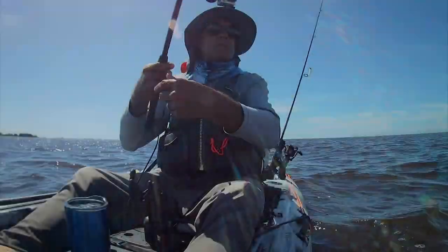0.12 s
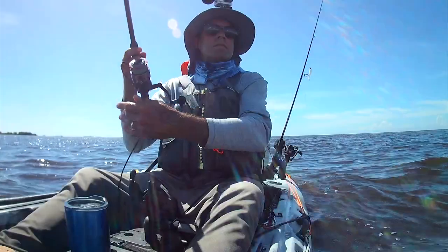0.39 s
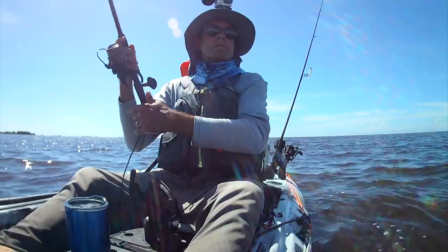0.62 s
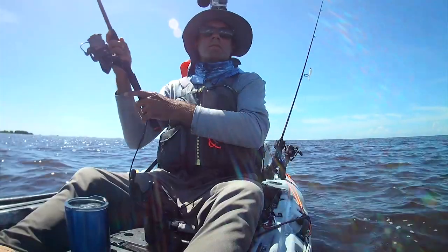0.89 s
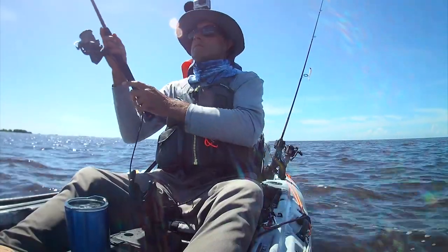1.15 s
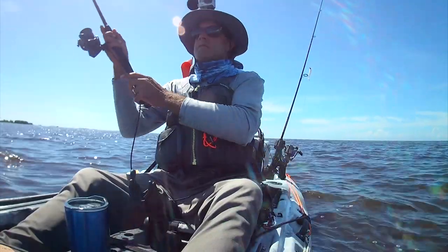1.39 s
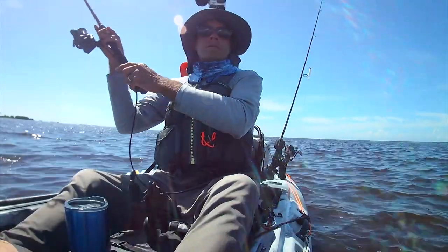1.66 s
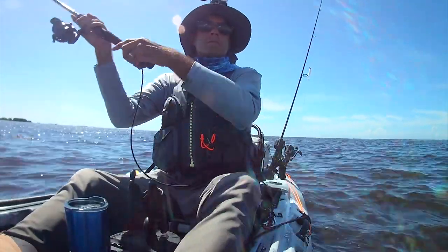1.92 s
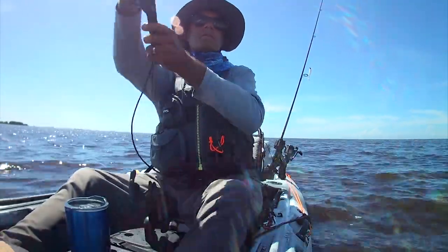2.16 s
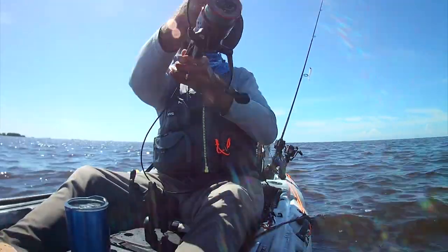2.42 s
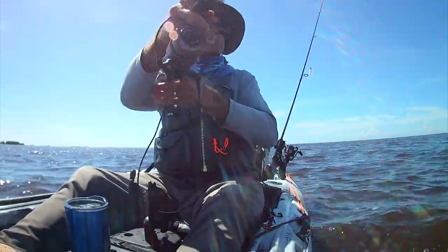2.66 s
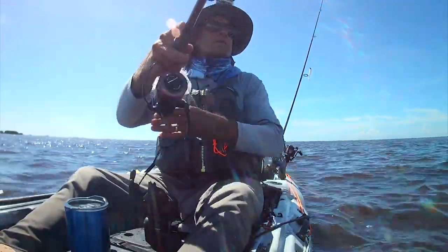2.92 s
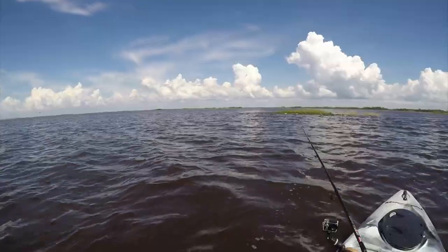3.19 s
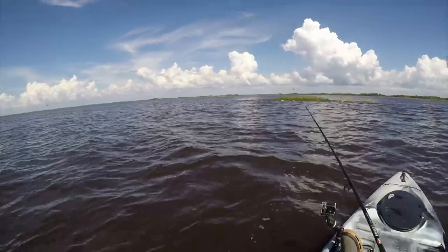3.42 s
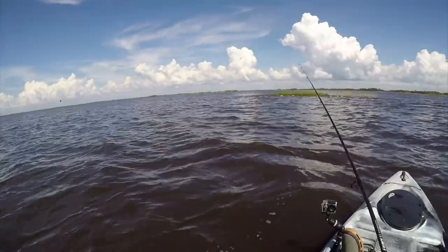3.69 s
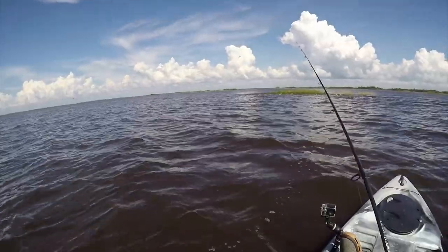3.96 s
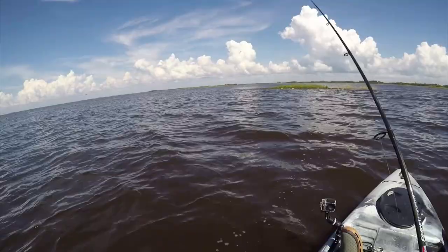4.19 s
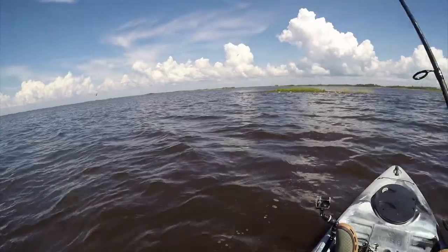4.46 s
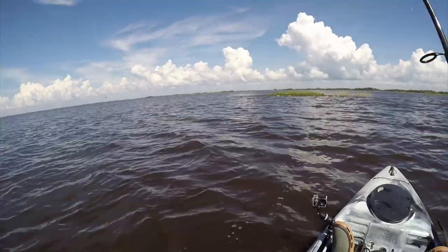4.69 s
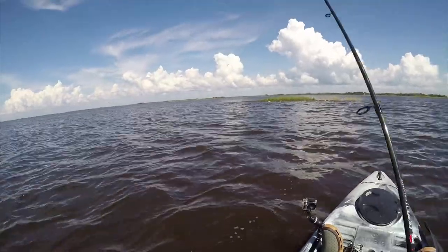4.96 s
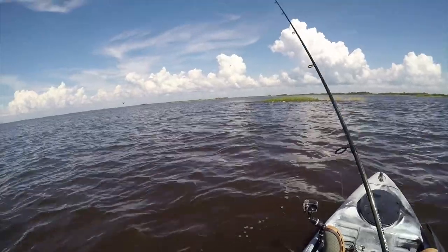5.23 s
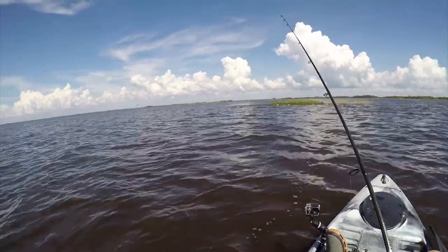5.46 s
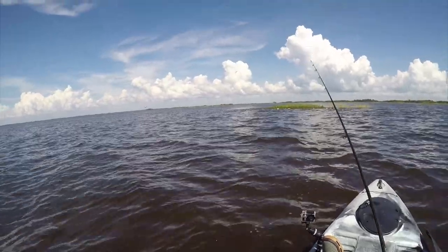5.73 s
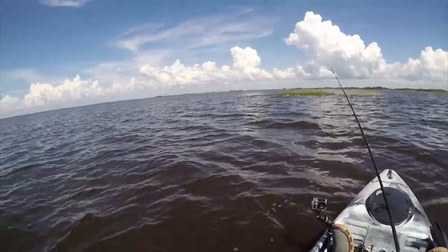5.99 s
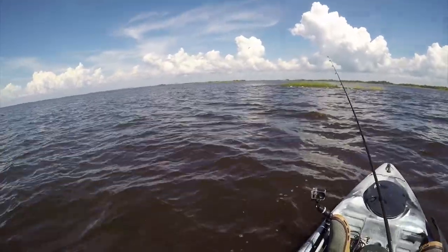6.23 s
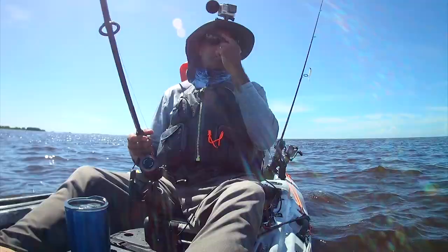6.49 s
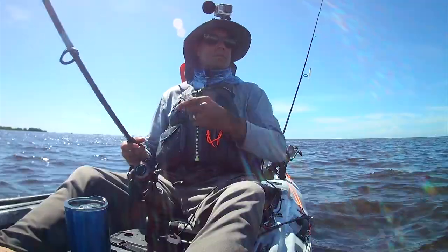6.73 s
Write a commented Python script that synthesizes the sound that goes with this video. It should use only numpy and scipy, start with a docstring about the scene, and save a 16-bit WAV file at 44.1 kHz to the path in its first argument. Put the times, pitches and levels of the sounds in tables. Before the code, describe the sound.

Wind rumbles on the microphone over hissing open water as a reel clicks, a rod whips, line hisses out and wavelets gulp against a hull.

```python
"""Casting from a kayak

An angler in a plastic kayak on breezy open water casts a lure. Wind rumbles on the microphone as swelling low noise
and water hisses in noise bands; a small bait pump chugs in its bucket, its strokes exciting housing resonances.
Wavelets gulp on the hull as gliding sine bubbles. Reel clicks and scrapes are short noise bursts; the cast is
shaped noise: a rod swish, line hiss in the guides and a drifting rub on the spool lip."""
import sys
import numpy as np
from scipy import signal
from scipy.io import wavfile
from scipy.ndimage import uniform_filter1d

SR = 44100
rng = np.random.default_rng(int(sys.argv[2]) if len(sys.argv) > 2 else 0)


def volts(x):
    """Linear amplitude factor 10**(x/20) for a level x in dB, scalar or array-like."""
    e = np.asarray(x, float) / 20
    return 10 ** e


def store_wav(level_fs):
    """Save 16-bit WAV to argv[1]."""
    pcm = np.round(np.clip(np.atleast_2d(level_fs), -1, 1) * 32767)
    wavfile.write(sys.argv[1], SR, pcm.T.astype(np.int16))


N = 302967  # length in samples

# The strongest wind buffets. Each row: centre in seconds, level of the slow eddies in dB, of the quick eddies in dB.
WIND_BUFFETS = [(.02, -22.5, -33), (.09, -27.5, -41), (.3, -32, -42), (.57, -20.5, -37), (.19, -39, -30),
                (.4, -25, -31.5), (1.63, -40, -31.5), (.83, -27.5, -44), (1.07, -39, -31),
                (1.18, -19.5, -35.5), (1.42, -18, -57), (1.58, -13, -42), (1.76, -20.5, -34.5),
                (2.24, -29, -33), (2.47, -24.5, -42), (2.82, -19.5, -32), (3.16, -22.5, -53),
                (3.32, -25, -31.5), (3.42, -19.5, -52), (3.56, -19.5, -51), (3.848, -19, -37.5),
                (4.0, -27, -52), (4.26, -21.5, -52), (4.38, -22, -35.5), (4.52, -18.5, -40),
                (4.74, -18, -41), (5.02, -28.5, -37.5), (5.16, -19, -43), (5.4, -27.5, -38),
                (5.65, -22, -40), (5.92, -22.5, -40), (6.02, -18.5, -43), (6.13, -28, -41),
                (6.19, -18.5, -39), (6.39, -21, -36), (6.65, -21, -52)]
# Tone of open water and breeze. Each row: frequency in Hz, relative density in dB per Hz.
WATER_TONE = [(65, -31), (110, 3.5), (314, -11.5), (619, -11.5), (1010, -16), (1270, -23), (1590, -22.5),
              (1770, -23.5), (3410, -27), (6070, -38.5), (15000, -39)]
# Resonances of the pump housing. Each row: centre in Hz, width in Hz, relative level in dB,
# drop on every other turn in dB.
PUMP_HOUSING = [(1024, 76, 0, 3), (1560, 125, -7, 1), (2130, 110, -16, 0), (3040, 130, -18, 3),
                (3405, 210, -8, 4), (4500, 600, -8.5, 0)]
# Pump strokes within one turn. Each row: start in turns, then the drive into each housing resonance in dB.
PUMP_STROKES = [(.07, -22, -5, -6, -6, -9, -3), (.17, 0, -5, 0, 0, 0, -4), (.29, -24, -8, -10, -4, -1, -3),
                (.42, -30, -14, -12, -10, -10, -4), (.4932, -11, -10, -8, -8, -16, -2),
                (.6, -24, 0, -3, -8, -20, -12), (.75, -26, -6, -12, -10, -12, -1)]
# The lowest housing resonance swells and fades. Each row: time in seconds, level in dB.
PUMP_HUM = [(0, -58), (2.1, -58), (2.6, -55), (3.4, -55.5), (3.56, -64), (3.75, -56), (6.2, -58.5),
            (6.4, -68), (6.87, -59.5)]
# Small bright droplets and taps. Each row: time in seconds, ring level in dB, starting pitch in Hz.
DROPLETS = [(.333, -47, 1900), (.36, -37, 1240), (.502, -47.5, 1350), (1.6023, -35.5, 1410),
            (1.8265, -37, 1324), (2.411, -47, 1870), (2.956, -36.5, 5840), (3.347, -45, 1180),
            (3.445, -48, 2320), (3.6444, -51, 2050), (3.765, -47, 1350), (3.8883, -42.5, 1290),
            (3.948, -37.5, 1460), (4.1384, -46.5, 1760), (4.6423, -44, 1255), (4.6643, -41, 3300),
            (4.836, -43, 2140), (4.8667, -38.5, 3610), (4.94, -48, 1380), (5.057, -40, 1950),
            (5.193, -28.5, 1850), (5.2076, -32.5, 1790), (5.21, -38.5, 1360), (5.702, -47, 2170),
            (5.781, -44, 1590), (5.875, -46, 1010), (5.933, -48, 1600), (5.44, -48, 1400),
            (5.59, -47, 1280), (4.517, -49, 1350), (5.312, -48, 1810), (5.748, -53, 6200),
            (5.756, -54, 5000), (5.74, -47, 3200), (5.804, -55, 7350), (5.813, -52, 6300),
            (5.832, -56, 5660), (5.845, -60, 7000), (4.843, -52, 3300), (1.824, -47, 3500),
            (1.83, -44, 1060), (2.329, -30, 5900), (4.76, -53, 4600)]
# Air pockets trapped between wavelet and hull. Each row: time in seconds, ring level in dB, starting pitch in Hz,
# slap level at its onset in dB.
HULL_GULPS = [(.321, -36.5, 650, -60), (0.344, -27, 462, -59), (.359, -49, 640, -57), (.379, -25, 566, -32),
              (.391, -36, 560, -57), (1.263, -41, 610, -47), (1.581, -39, 675, -50), (1.603, -35, 650, -41),
              (1.61, -29.5, 574, -57), (1.626, -24.5, 578, -43), (1.824, -36, 774, -49),
              (1.832, -36, 720, -55), (2.14, -42, 330, -62), (3.905, -39.5, 344, -65),
              (4.125, -43, 690, -60), (2.085, -48, 527, -59), (3.894, -46, 620, -65),
              (3.954, -39, 895, -36), (3.979, -46, 620, -45), (4.649, -29, 633, -53),
              (4.673, -29.5, 590, -63), (5.058, -49, 523, -63), (5.076, -46, 515, -61),
              (5.798, -35.5, 578, -47), (5.803, -42, 553, -39.5), (5.824, -41, 550, -50),
              (5.86, -51, 700, -57), (6.336, -39.5, 540, -49)]
# Wavelets breaking up along the hull. Each row: start in seconds, length in seconds, level in dB,
# highest starting pitch of the bubbles in Hz.
HULL_WASH = [(0.311, 0.12, -43, 1490), (1.196, 0.16, -50.5, 1210), (1.569, .12, -46.5, 1930),
             (1.813, 0.054, -57, 2000), (2.057, 0.17, -47, 1104), (3.326, 0.089, -55, 1790),
             (3.873, .05, -54, 1200), (3.938, 0.032, -44.5, 3500), (3.95, 0.048, -51.5, 2200),
             (5.856, 0.034, -56, 3580), (4.634, 0.093, -48.5, 1600), (5.055, 0.06, -48.5, 1500),
             (5.681, 0.27, -56.5, 5570), (5.403, 0.1, -56, 1710), (4.102, .09, -59, 1900),
             (5.201, 0.019, -47, 1300), (5.776, 0.094, -41.5, 894), (6.302, 0.085, -63, 1210)]
# Clicks of reel, rod and line. Each row: time in seconds, onset level in dB, centre in Hz,
# body relative to the bright part in dB.
TACKLE_CLICKS = [(.027, -48, 11500, 10.5), (.2157, -17, 11800, -11), (.2204, -31, 11800, -10),
                 (.2303, -41, 12300, 9.5), (.332, -49, 12000, -12), (.343, -50, 12000, -12),
                 (.392, -43, 9800, -17), (.5457, -46, 6000, -4), (.561, -45, 3600, -6),
                 (.5995, -50, 11300, -11), (.6717, -47, 12900, -16), (.7437, -47, 11500, -21),
                 (1.1982, -46.5, 9000, 2), (1.6232, -34, 13200, -22), (1.6347, -29, 9550, -11),
                 (1.8507, -45, 4150, -3), (1.973, -45.5, 9060, -17), (2.145, -50, 7200, 3),
                 (2.2067, -35.5, 8900, -12), (2.2694, -28.5, 9670, -17), (2.3125, -24, 12300, -22),
                 (2.329, -21, 11500, -7.5), (2.386, -39, 12800, 4.5), (2.4117, -21.5, 13600, -10.5),
                 (2.5667, -44, 12800, 1), (2.7278, -37, 12800, -0.5), (2.8577, -46.5, 8800, 5),
                 (2.9564, -36, 11700, -14), (3.148, -41, 5930, -2), (2.945, -42, 4500, -8),
                 (3.337, -38, 5500, -7), (3.025, -50, 2600, -8), (3.458, -52, 1500, -20),
                 (2.128, -49, 7600, -20), (.514, -58, 6800, -20), (2.295, -34, 7000, -15),
                 (3.467, -37, 11700, -19), (3.488, -23.5, 12100, -22), (4.015, -53, 10800, -1),
                 (4.2464, -52, 7150, 7), (4.665, -44.5, 6550, 2), (4.8852, -42, 7160, -15),
                 (4.9496, -47, 10700, -8), (5.123, -52, 9000, -10), (5.4227, -50, 12000, 0),
                 (5.77, -44, 3500, -12), (5.906, -41, 3270, -18), (5.862, -55, 3900, -10),
                 (5.874, -45, 2600, -14), (5.1924, -25, 9100, 1), (5.2092, -32, 12600, -13),
                 (5.7994, -33, 10700, -16), (6.351, -40, 11400, -23)]
# Line and cloth dragged over the gear. Each row: time in seconds, level at the height of the stroke in dB,
# centre in Hz, body relative to the bright part in dB, length in seconds.
TACKLE_SCRAPES = [(0.047, -59, 12000, -6, 0.025), (.411, -56, 13000, -14, 0.012),
                  (0.553, -64, 10400, 7, 0.026), (2.277, -39, 11500, -13, 0.045),
                  (2.412, -42.5, 12300, 0, 0.015), (3.344, -47, 11000, -10, 0.013),
                  (3.907, -46, 12600, -20, 0.027), (3.936, -53.5, 11260, 11, 0.024),
                  (0.679, -64, 10500, -10, 0.019), (0.098, -65, 11500, -3, .035),
                  (4.054, -63, 7850, -1, 0.01), (4.163, -52.5, 6550, -9, 0.053),
                  (4.164, -53, 11500, -24, 0.056), (5.193, -31.5, 12700, -14, 0.012),
                  (5.199, -52.5, 12100, 6, 0.026), (5.31, -42, 12900, -8, 0.013),
                  (6.364, -50, 11500, -21, 0.012)]
# Line running through the guides. Each row: time in seconds, level in dB.
LINE_HISS = [(2.17, -70), (2.27, -47), (2.45, -49), (2.6, -47.5), (2.76, -47.5), (2.88, -53.5),
             (3.1, -58.5), (3.3, -60.5), (3.55, -60.5), (3.75, -56.5), (3.92, -61), (3.955, -64)]
# Line rubbing the spool lip. Each row: time in seconds, level in dB, centre in Hz, focus from 0 (wide) to 1 (narrow).
SPOOL_LIP = [(2.72, -73, 9300, .5), (2.86, -58, 8820, .3), (3.05, -56, 8100, .45), (3.2, -55.5, 7600, .6),
             (3.32, -57, 7190, .5), (3.42, -58.5, 7800, .1), (3.6, -58, 8440, .15), (3.95, -60, 8400, 0)]

# wind: steady level of each eddy size, how much both wander, and the time constant of a buffet
SLOW_DB, QUICK_DB, WANDER_DB, BUFFET_S = -29.5, -40.5, 2, 0.021
# water: level of the hiss, flicker of all bands, extra flicker above 6 kHz, base level of the tiny bubbles
WATER_DB, FLICKER_DB, TREBLE_FLICKER_DB, PATTER_DB = -49, 0.5, 2, -55.5
# pump: turns per second, spread of the knocks' timing drift, reference level of the higher resonances
PUMP_HZ, PUMP_DRIFT_S, RATTLE_DB = 20.69, .0007, -58
# drops: ring length in cycles; tick level against the ring, and tick length
DROP_CYCLES, DROP_TICK_DB, DROP_TICK_S = 38, 1, 0.005
# gulps: ring length in cycles, share by which churning water shakes it; gurgle level against the gulp, and span
GULP_CYCLES, GULP_ROUGH, GURGLE_DB, GURGLE_S = 19, .25, -21.5, .06
# wash: bubble density, random loudness spread, highest over lowest bubble pitch
WASH_BUBBLES_PER_S, WASH_SPREAD_DB, WASH_PITCH_RATIO = 900, 2.6, 7
# tackle: time for a click to fall 60 dB, level wander inside a scrape
CLICK_T60_S, SCRAPE_GRAIN_DB = .016, 4
# the guides sing around one broad resonance
GUIDES_CENTRE_HZ, GUIDES_WIDTH_HZ = 12100, 3500
# the rod whips through the air, then shivers on, past the end of the line hiss
WHIP_S, WHIP_DB, WHIP_RISE_S, WHIP_FALL_S = 2.27, -41, .036, 0.019
SHIVER_DB, SHIVER_FADE_DB_PER_S, SHIVER_ENDS_S = -51, 9, 4.4


def unit(x):
    """Scaled to rms 1."""
    return x / np.sqrt(np.mean(x ** 2))


def curves(table, silent=None):
    """Each column drawn over time; silent is the value outside the rows."""
    s, *columns = np.transpose(table)
    return [np.interp(np.arange(N) / SR, s, c, silent, silent) for c in columns]


def band(x, lo_hz, hi_hz, order=2):
    """Butterworth band-pass."""
    edges_hz = [lo_hz, min(hi_hz, SR / 2.1)]
    return signal.sosfilt(signal.butter(order, edges_hz, "bandpass", fs=SR, output="sos"), x)


def ring(x, hz, width):
    """One resonance, gain 1 at the centre."""
    return signal.lfilter(*signal.iirpeak(hz, hz / width, SR), x)


def walk(rate):
    """Random levels held 1 / rate s and slewed twice; spread 1."""
    hold = int(SR / rate)
    steps = np.repeat(rng.standard_normal(N // hold + 1), hold)
    return unit(uniform_filter1d(uniform_filter1d(steps, hold), hold)[:N])


def add(out, s, x):
    """Mix a short sound in at time s."""
    i = int(s * SR)
    out[i:i + len(x)] += x[:max(len(out) - i, 0)]


def bubble(db, hz, t60, glide):
    """A pocket of air rings, holds a moment, and rises glide octaves in pitch as it closes."""
    u = np.linspace(0, 1, int(t60 * SR))
    phase = 2 * np.pi * np.cumsum(hz * 2 ** (glide * u)) / SR
    onset = 1 - np.exp(-u * t60 * hz * 1.8)
    return volts(db - 60 * u ** 1.6) * onset * np.sin(phase)


def wind():
    """Eddies roll over the microphone port; buffets set their size, so the noise under them is kept even."""
    out, t = 0, np.arange(N) / SR
    s, *peaks_db = np.transpose(WIND_BUFFETS)
    for (lo_hz, hi_hz), steady_db, peak_db in zip([(12, 42.7), (45, 115.0)], [SLOW_DB, QUICK_DB], peaks_db):
        power = volts(steady_db + WANDER_DB * walk(9)) ** 2
        for at, db in zip(s, peak_db):
            power = power + volts(db) ** 2 * np.exp(-((t - at) / BUFFET_S) ** 2)
        gust = np.sqrt(power)
        eddies = band(rng.standard_normal(N), lo_hz, hi_hz)
        eddies = signal.lfilter([1], [1, -np.exp(-2 * np.pi * lo_hz / SR)], eddies)
        # divide by the noise's own slow level to even it out
        size = np.sqrt(uniform_filter1d(eddies ** 2, int(3.0 * SR / lo_hz)) + 1e-18)
        out = out + gust * unit(band(eddies / size, lo_hz * 0.47, hi_hz, order=1))
    # the smallest eddies come in ragged flurries that follow the quick buffets, the last gust above
    ragged = volts(-35.5 + 2.7 * walk(18))
    flurries = unit(band(rng.standard_normal(N), 97, 236.0)) * gust ** 0.5 * ragged
    return out + flurries


def water():
    """Half-octave noise bands, each flickering on its own, with a patter of tiny bubbles."""
    out, (hz_at, db_at) = 0, np.transpose(WATER_TONE)
    for hz in 125 * 2 ** (np.arange(15) / 2):
        flicker_db = (FLICKER_DB + TREBLE_FLICKER_DB * (hz > 6000)) * walk(12)
        # density becomes band level: a wider band holds more power
        db = np.interp(np.log(hz), np.log(hz_at), db_at) + 10 * np.log10(hz) + flicker_db
        out = out + volts(db) * unit(band(rng.standard_normal(N), hz * 2 ** -.25, hz * 2 ** 0.37))
    out = unit(out) * volts(WATER_DB)
    for when, pitch, chance in rng.random((400, 3)):
        hz = 300 * 2 ** (3.5 * pitch)
        # higher is softer, and a few are much louder
        db = PATTER_DB - 3 * np.log2(hz / 300) - 2.0 * np.log(chance)
        add(out, when * N / SR, bubble(db, hz, 14 / hz, 0.094))
    return out


def pump():
    """Each stroke is a drifting knock and a puff over a steady air leak, ringing the housing; turns alternate."""
    turns = np.arange(int(N / SR * PUMP_HZ))
    out, strokes, hum_db = 0, [], curves(PUMP_HUM)[0]
    puff = np.sin(np.linspace(0, np.pi, int(0.0071 * SR)))
    tap = np.hanning(int(.00028 * SR)) / 3
    drift = PUMP_DRIFT_S * walk(2)
    hiss = band(rng.standard_normal(N), 1450, 8000, order=4)
    for start, *_ in PUMP_STROKES:
        knock, air = np.zeros((2, N))
        for turn, (scatter, jitter) in zip(turns, rng.standard_normal((len(turns), 2))):
            size = volts(.7 * scatter)
            at = (turn + start) / PUMP_HZ
            add(knock, at + drift[int(at * SR)] + .00003 * jitter, size * tap)
            add(air, at, size * puff)
        strokes.append(knock + .028 * (air + .04) * hiss)  # .04 is the steady leak
    weak = (np.arange(N) * PUMP_HZ / SR).astype(int) % 2 == 0
    for mode, (hz, width, db, weak_db) in enumerate(PUMP_HOUSING):
        drive = sum(volts(row[mode + 1]) * x for row, x in zip(PUMP_STROKES, strokes))
        drive = drive * volts(-weak_db * weak)
        level_db = db + (RATTLE_DB if mode else hum_db)
        out = out + volts(level_db) * unit(ring(ring(drive, hz, width), hz, width))
    return out


def drops():
    """Each drop rings as a small rising bubble under a short noise tick."""
    out = np.zeros(N)
    for s, db, hz in DROPLETS:
        add(out, s - .001, bubble(db, hz, DROP_CYCLES / hz, 0.19))
        tick = unit(band(rng.standard_normal(int(DROP_TICK_S * SR)), hz * 0.88, hz * 1.1))
        add(out, s - .001, tick * volts(db + DROP_TICK_DB - 31 * np.linspace(0, 1, len(tick))))
    return out


def gulps():
    """A trapped pocket opens with a wet slap, rings roughly and gurgles out in six smaller bubbles."""
    out = np.zeros(N)
    for s, db, hz, slap_db in HULL_GULPS:
        gulp = bubble(db, hz, GULP_CYCLES / hz, 0.13)
        churn = unit(band(rng.standard_normal(len(gulp)), 40, 180, order=3))
        add(out, s - .001, gulp * (1 + GULP_ROUGH * churn))
        for when, pitch in rng.uniform(0.24, 1, (6, 2)):
            small_hz = hz * 2 ** (2 * pitch - .8)
            small = bubble(db + GURGLE_DB - 12 * when, small_hz, 11 / small_hz, 0.34)
            add(out, s + when * GURGLE_S, small)
        slap = unit(band(rng.standard_normal(int(.018 * SR)), 800, 3700, order=4))
        add(out, s - .002, slap * volts(slap_db - 60 * np.linspace(0, 1, len(slap))))
    return out


def wash():
    """A breaking wavelet is low slosh and a crowd of small bubbles under one swell."""
    out = np.zeros(N)
    for s, length, db, top_hz in HULL_WASH:
        crowd = np.zeros(int(length * SR))
        for when, pitch, chance in rng.random((int(length * WASH_BUBBLES_PER_S), 3)):
            hz = top_hz * WASH_PITCH_RATIO ** -pitch
            bubble_db = -2.2 * np.log2(hz / 180) - WASH_SPREAD_DB * np.log(chance)
            add(crowd, when * length, bubble(bubble_db, hz, 8 / hz, 0.23))
        slosh = band(rng.standard_normal(len(crowd)), 85, top_hz / 2)
        swell = np.sin(np.pi * np.linspace(0, 1, len(crowd)) ** 0.72).clip(0)
        add(out, s, volts(db) * swell * (unit(crowd) + 0.69 * unit(slosh)))
    return out


def contact(hz, body_db, shape, spike):
    """Rough contact under an envelope: bright around its centre, with a duller body under it."""
    rub = rng.standard_normal((2, len(shape)))
    rub[:, 0] += spike  # a harder first edge
    bright = unit(band(rub[0], 0.78 * hz, 1.63 * hz, order=3))
    body = unit(band(rub[1], 900, 6500, order=1))
    return shape * (bright + volts(body_db) * body)


def tackle():
    """Clicks start on a hard edge and die at once; scrapes swell and fade with a grainy, catching level."""
    out = np.zeros(N)
    # faint clicks scattered at random among the listed ones
    faint = [(when * N / SR, -66 + 9 * size ** 2, 7000 + 6000 * pitch, -10)
             for when, size, pitch in rng.random((160, 3))]
    fall_db = 60 * np.linspace(0, 1, int(CLICK_T60_S * SR)) ** 0.86
    for s, db, hz, body_db in [*TACKLE_CLICKS, *faint]:
        add(out, s, contact(hz, body_db, volts(db - fall_db), spike=0.52))
    grain_db = SCRAPE_GRAIN_DB * walk(400)
    for s, db, hz, body_db, length in TACKLE_SCRAPES:
        u = np.linspace(0, 1, int(length * SR))
        grainy_db = db + grain_db[int(s * SR):][:len(u)]
        stroke = np.sqrt(np.sin(np.pi * u ** .7).clip(0))
        add(out, s - .002, contact(hz, body_db, volts(grainy_db) * stroke, spike=0))
    return out


def cast():
    """Line hisses and flutters in the guides and on the spool lip, and ticks on the rod; the rod swishes below."""
    guides_db = curves(LINE_HISS, silent=-120)[0]
    lip_db = curves(SPOOL_LIP, silent=-120)[0]
    _, lip_hz, focus = curves(SPOOL_LIP)
    after = np.arange(N) / SR - WHIP_S
    whip = volts(WHIP_DB) * np.exp(-np.abs(after) / np.where(after < 0, WHIP_RISE_S, WHIP_FALL_S))
    shiver = volts(SHIVER_DB - SHIVER_FADE_DB_PER_S * after) * (after > 0) * (after < SHIVER_ENDS_S - WHIP_S)
    hiss = rng.standard_normal((3, N))
    guides = ring(hiss[0], GUIDES_CENTRE_HZ, GUIDES_WIDTH_HZ)
    guides = unit(ring(guides, GUIDES_CENTRE_HZ, GUIDES_WIDTH_HZ))
    guides = guides * volts(guides_db + 2.2 * walk(150) + 1.2 * walk(15))
    # a slow noise carried on the moving centre makes a band that drifts
    narrow, wide = (unit(band(hiss[1], 16, top_hz, order=1)) for top_hz in (480, 1900))
    lip = (focus * narrow + (1 - focus) * wide) * np.cos(2 * np.pi * np.cumsum(lip_hz) / SR)
    lip = unit(lip) * volts(lip_db + 2 * walk(110))
    # about 120 ticks a second, mixed under the air noise of the rod
    ticks = (rng.random(N) < 120 / SR) * rng.uniform(-1, 1, N)
    swish = unit(band(hiss[2], 1200, 6000, order=1)) + .45 * unit(band(ticks, 3000, 7500))
    return guides + lip + swish * np.maximum(whip, shiver) * volts(walk(60))


def scene():
    """Everything close at hand, in the open: no room."""
    lapping = drops() + gulps() + wash()
    return (wind() + water() + pump() + lapping + tackle() + cast())[None]


def roll_off(x):
    """The treble ends steeply here."""
    return signal.sosfilt(signal.butter(12, 16530, fs=SR, output="sos"), x)


def record(dry):
    """A steep low-pass, 38 dB down from 15520 Hz up."""
    mix = signal.sosfilt(signal.cheby2(12, 38, 15520, fs=SR, output="sos"), dry)
    return roll_off(mix)


dry = scene()
out = record(dry)
store_wav(out)
```